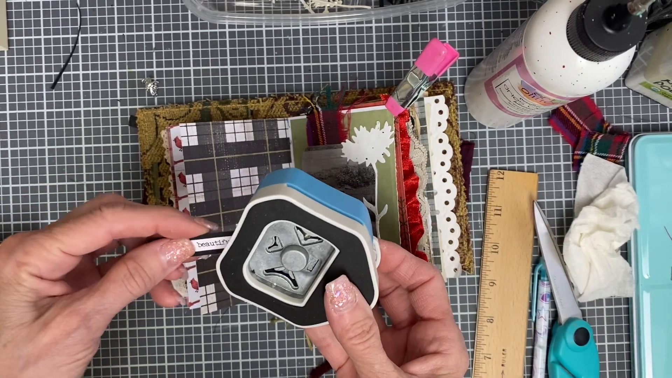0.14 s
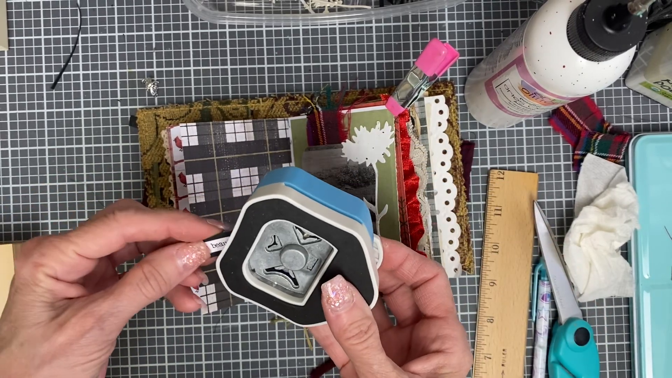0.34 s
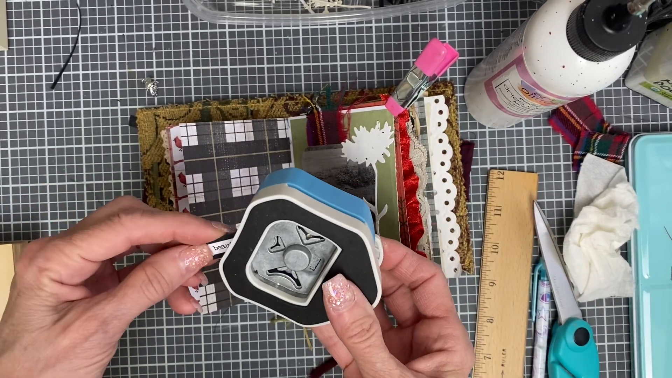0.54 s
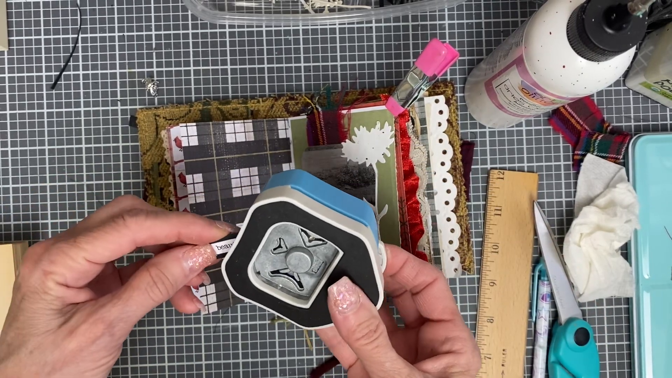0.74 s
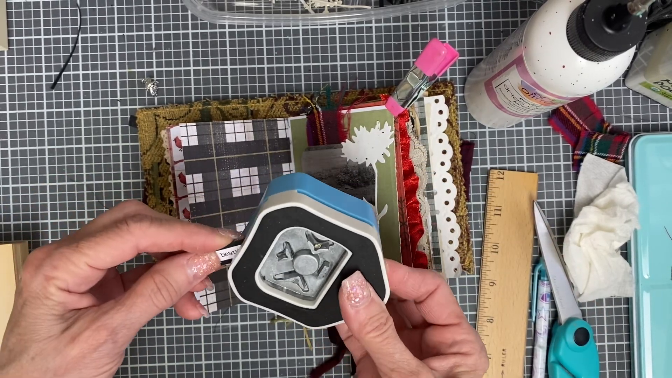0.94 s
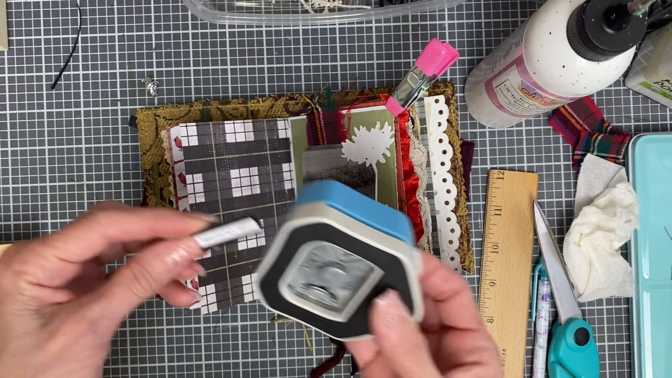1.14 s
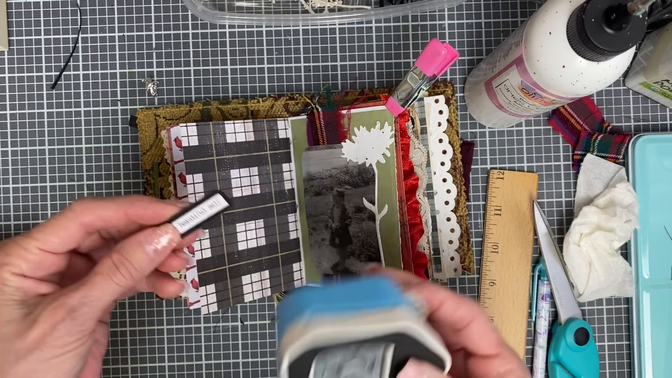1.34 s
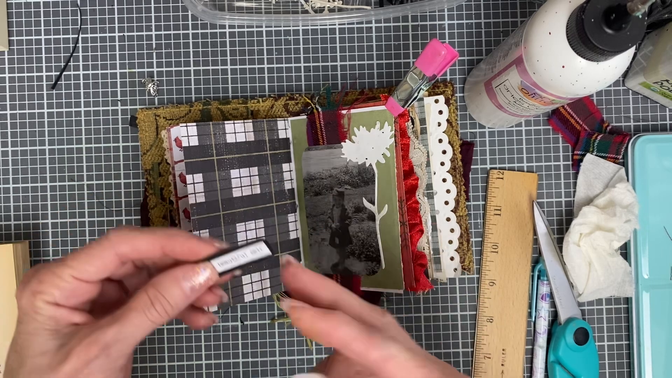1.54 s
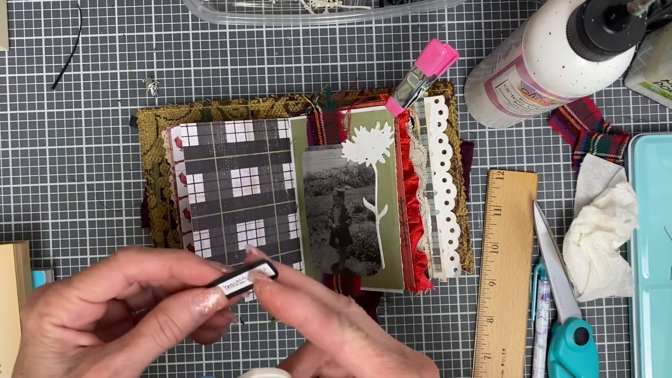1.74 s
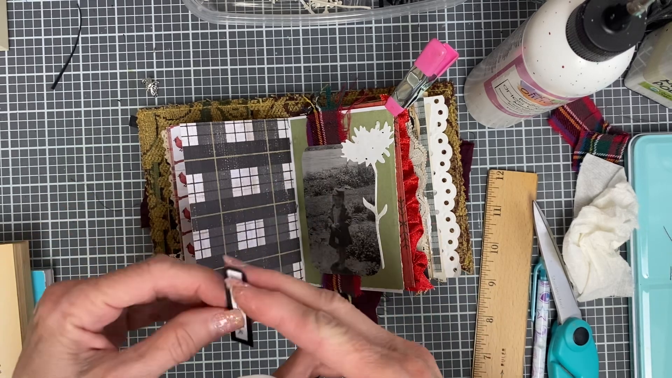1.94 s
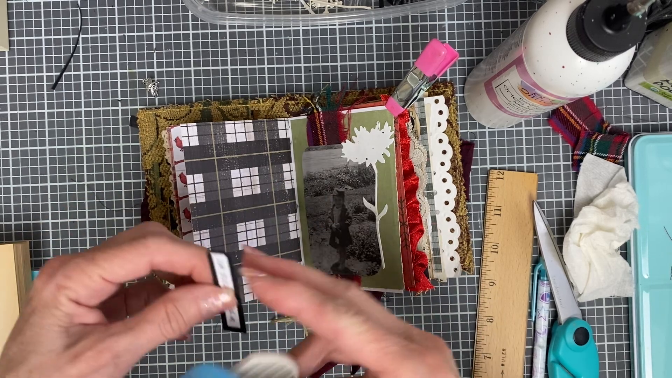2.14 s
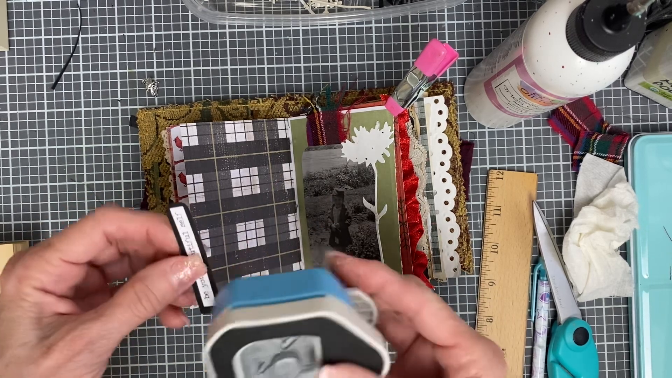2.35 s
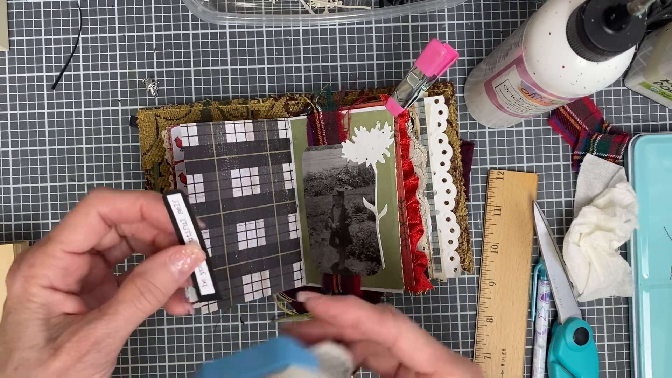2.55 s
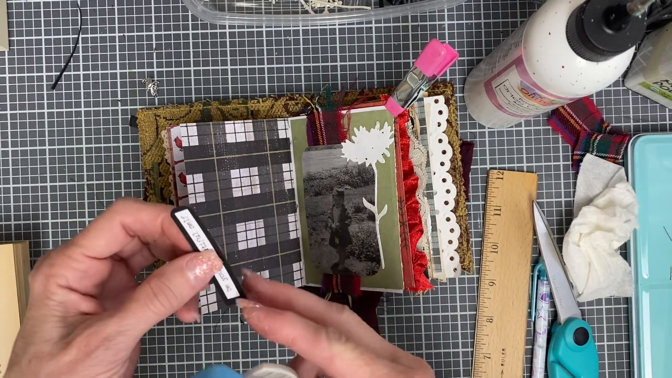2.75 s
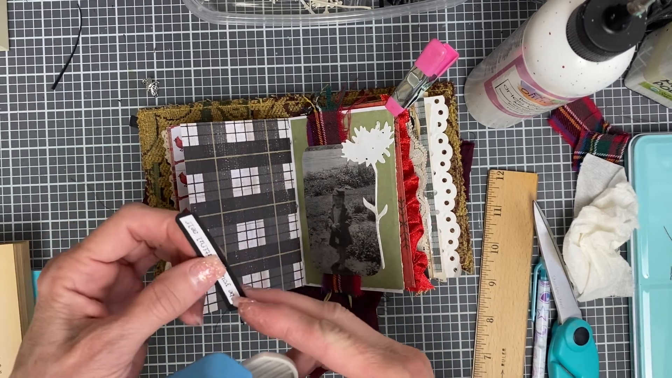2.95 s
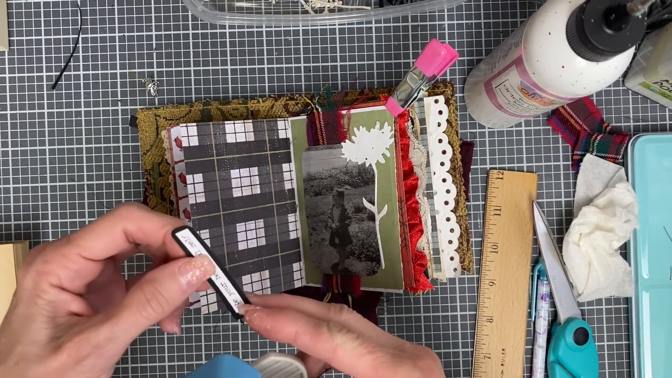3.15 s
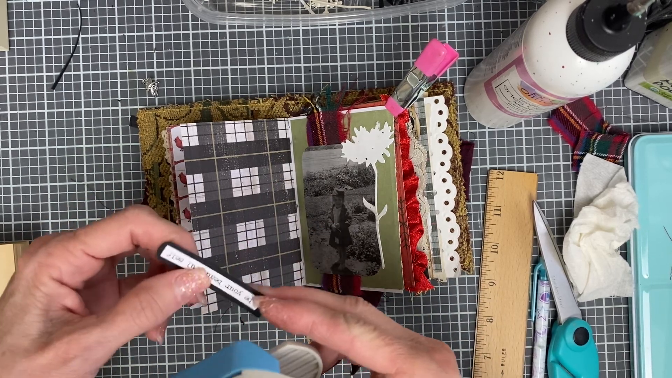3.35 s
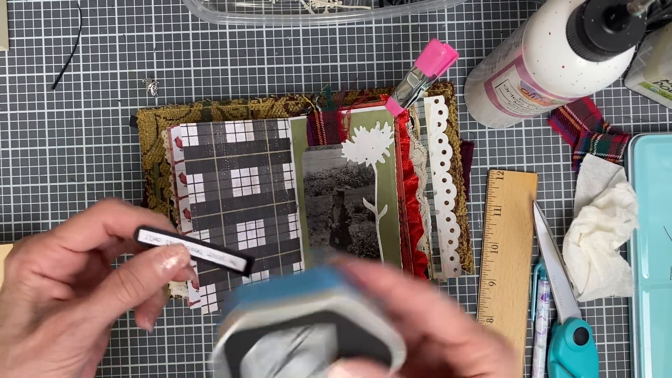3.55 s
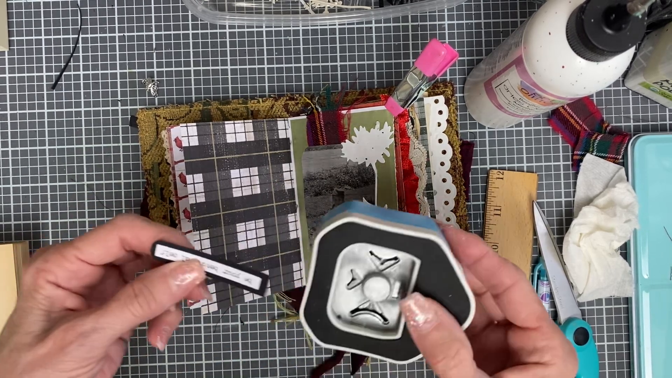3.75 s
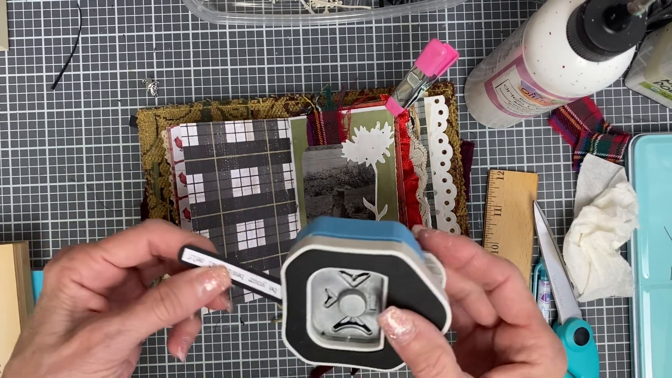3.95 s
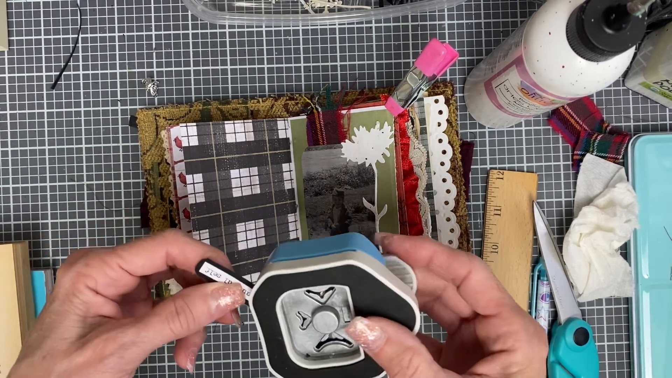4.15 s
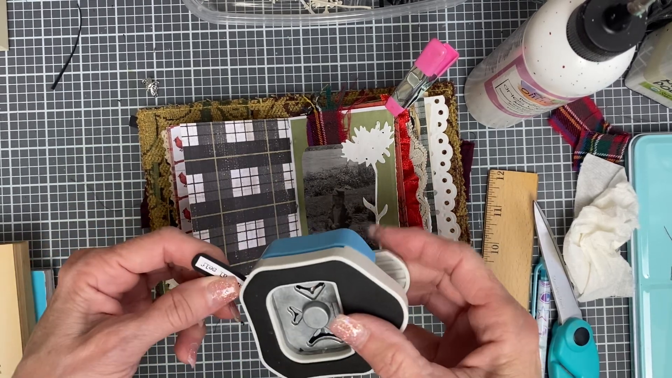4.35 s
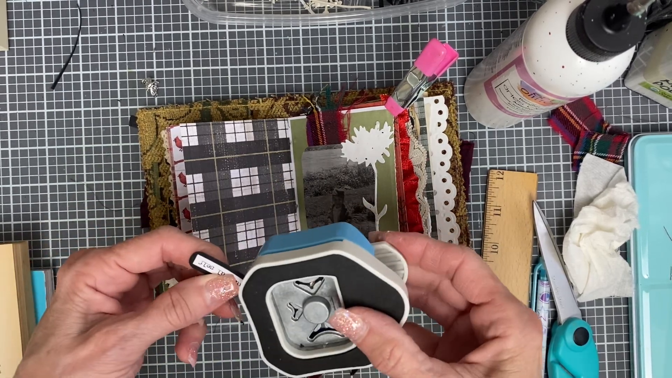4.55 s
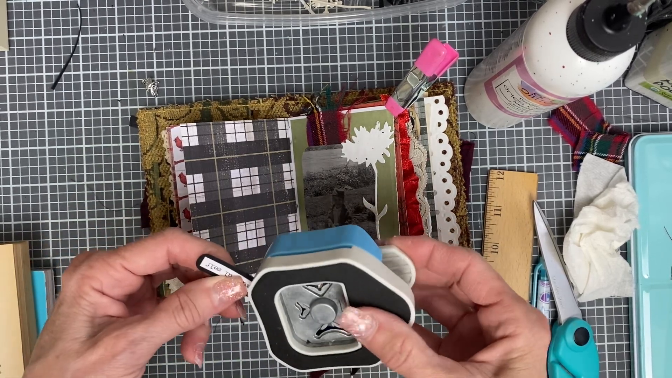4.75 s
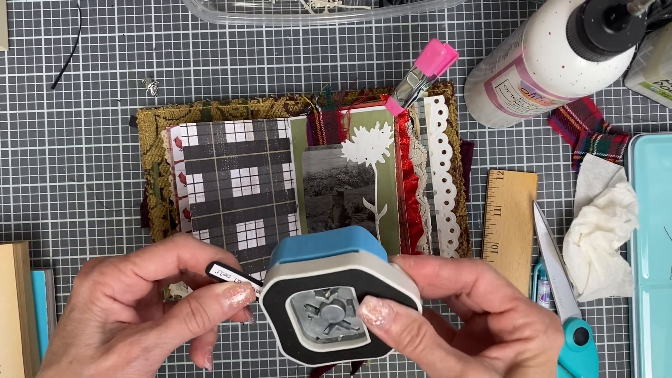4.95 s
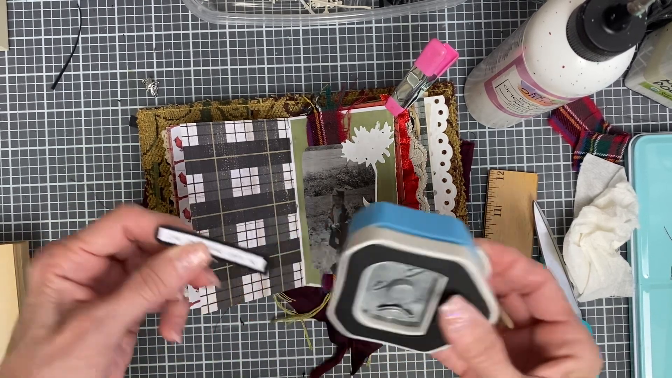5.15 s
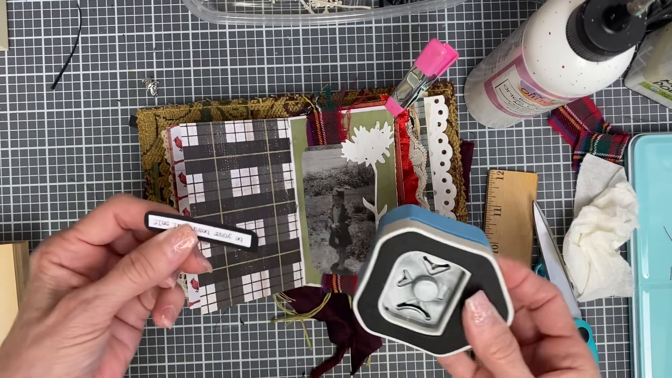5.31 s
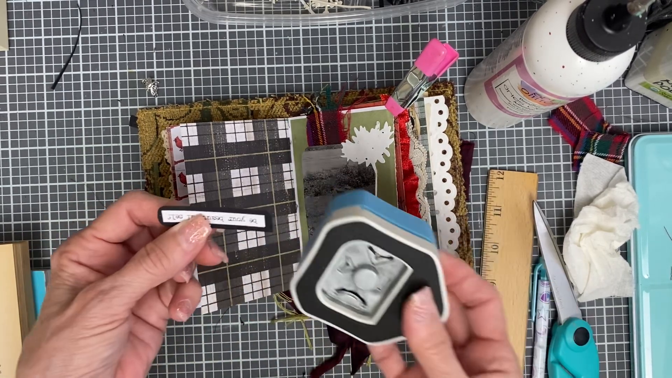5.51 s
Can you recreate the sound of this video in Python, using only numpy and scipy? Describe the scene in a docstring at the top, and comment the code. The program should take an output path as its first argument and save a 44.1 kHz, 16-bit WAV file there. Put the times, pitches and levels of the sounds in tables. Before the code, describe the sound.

Two crisp, loud clacks of a small craft punch, each followed by a lighter release click, with soft paper handling over low room rumble.

```python
"""Fingers brush a paper strip over a low rumble and mains hum; then a plastic corner punch bites it twice.
All is close under a camera in a quiet room. The lever creaks shut, the die snaps through, the spring lets go.
Contacts and lever drags are rough forces ringing casing, die and cutting edge; squeaks and spring are dying sines.
Rubs and flicks of the strip, turned by the fingers between bites, are coloured noise grains.
Sparse echoes give the room; shaped noise and wavering sines give the background noise and hum."""
import sys
import numpy as np
from scipy import signal
from scipy.fft import rfft, irfft
from scipy.io import wavfile

SR = 44100
rng = np.random.default_rng(int(sys.argv[2]) if len(sys.argv) > 2 else 0)


def inscribe(sig):
    """Save sig as 16-bit PCM at rate SR to the path in sys.argv[1].

    A 1-D sig is mono; a 2-D sig holds one channel per row.
    Samples are clipped to [-1, 1] before scaling.
    """
    pcm = np.round(np.clip(np.atleast_2d(sig).T, -1, 1) * 32767)
    wavfile.write(sys.argv[1], SR, pcm.astype(np.int16))


N = 250488  # samples

# Contacts in the punch, from lever ticks to the die breaking through and hitting its stop; shares are
# relative to the blow: [t/s, blow level/dB, thud share level/dB, case share level/dB, edge share level/dB,
# favoured case mode f/Hz, scrape peak t/ms]
PUNCH_CONTACTS = [(0.2703, -42, -21, 1.5, -8, 1300, 1.37), (0.7366, -56.5, -38.5, 14.5, -10, 1940, 1.35),
                  (0.7485, -70, -26, 16.5, -3, 1870, 0.8), (0.7921, -68.5, -9.5, 13, -5, 2820, 2.6),
                  (.8217, -47, -37.5, 0, -6.5, 2570, 1.5), (.826, -41.5, -30.5, 3, -12, 2508, 1.5),
                  (0.8407, -70.5, -10.5, 19, 4, 1760, 0.66), (0.8778, -42.5, -15, 3.5, 0.5, 1930, 7.6),
                  (.899, -33, -4.5, 4.5, -1.5, 1760, 1.6), (0.9517, -16, -15.5, 0, -6, 2100, 0.4),
                  (.9538, -11, -16.5, -3.5, 6, 1270, .5), (.9563, -10.5, -13, 2, -8, 1734, 0.55),
                  (.9612, -27.5, -16.5, 1.5, -3.5, 1690, 1.5), (1.0789, -47, -32.5, 10.5, -0.5, 1650, 0.97),
                  (1.0838, -44.5, -30.5, -0.5, -9, 1640, 1.06), (1.101, -46, -29, 1, -17, 2830, 0.96),
                  (1.1062, -40.5, -36, 1, -4.5, 1570, 1.5), (1.1116, -30, -40, 0.5, -12.5, 2780, .9),
                  (1.1442, -57.5, -13, 4.5, -9, 1776, 1.5), (1.191, -58, -27, 8.5, -21.5, 1753, 1.05),
                  (1.2701, -52.5, -33, -8.5, 7, 2160, 0.94), (1.3869, -77, -7, 12, 10, 1683, 1.2),
                  (1.4122, -77, -6, 14.5, -2, 1760, 1.3), (2.506, -79, -3, 9, 14, 1678, 1.3),
                  (2.858, -65.5, -20, 4.5, 0.5, 2170, 1.03), (4.123, -62, -21, 2, -12, 1780, 1.3),
                  (4.6493, -75, -9.5, 8.5, 0.5, 2010, 1.56), (4.7565, -63, -26, 6, -10, 1800, .6),
                  (4.7678, -53, -22, 9.5, -1.5, 1680, 1.55), (4.791, -53, -15.5, 3.5, -6, 1630, 1),
                  (4.806, -45, -17.5, 2, -6, 1750, 1.5), (4.824, -51, -23.5, 9, -11, 1660, 0.6),
                  (4.838, -46, -10.5, 6.5, 2.5, 1640, 1.16), (4.8591, -32.5, -10, 7.5, -1.5, 2080, 1.6),
                  (4.8634, -29.5, -6.5, 8, -5, 1600, 0.72), (4.8665, -18, -9.5, 5, -3, 1550, .65),
                  (4.8694, -14.5, -14, -6.5, 7.5, 1300, .4), (4.8722, -12, -16.5, -2, -2.5, 1295, 0.53),
                  (4.8806, -33, -22.5, -3, -3, 1520, 1.5), (4.9684, -57, -25, 2, 5, 1700, 1.8),
                  (4.9779, -57, -25, 3, -2, 1690, 1.2), (5.0484, -41, -36, 6, -5.5, 2130, 1.35),
                  (5.0574, -50.5, -28, 13.5, -1, 1774, 1.43), (5.0848, -49.5, -33, 9, -14.5, 1767, 1.3),
                  (5.2715, -62, -25.5, 3.5, 4, 1062, 1.12), (5.4044, -51, -24, 0, 3, 2000, 1.32)]
# The lever drags in its guide, down and up; the row at .946 s is only a short swell of rough noise into the
# bite: [full force t/s, 20 dB rise t/ms, hold t/ms, 20 dB fall t/ms, force level/dB, edge share level/dB]
DRAG_STROKES = [(.738, 19, 30, 60, -67.5, -17.5), (.832, 3, 2, 110, -62, -17.5),
                (.908, 5.2, 1.6, 12, -48, -17), (.946, 12, 4.9, 2.7, -39, -30),
                (1.1, 110, 1.73, 10, -54, -13.5), (1.113, 11, 1.65, 12, -35, -7.5),
                (1.13, 2.9, 2.05, 47, -58, -33.5), (1.16, 10.7, 25.7, 90, -71, -16),
                (4.76, 15, 85, 5, -65, -12), (4.859, 15, 0.95, 2, -40, -14),
                (5.042, 55, 1.84, 5.1, -53.5, -9), (5.056, 13.8, 1.9, 21, -44, 0),
                (5.096, 8.7, 1.7, 63, -67, -32), (5.41, 3, 5, 50, -66.5, -18)]
# Ringing modes of the plastic casing: [f/Hz, width f/Hz, relative level/dB]
CASE_MODES = [(1016, 300, -9.5), (1282, 290, -3), (1570, 210, 0), (1730, 160, 1.5), (2130, 150, -4),
              (2473, 260, -0.5), (3080, 250, -5)]
# Ringing modes of the die: [f/Hz, width f/Hz, relative level/dB]
DIE_MODES = [(3200, 450, -8), (3920, 400, 0), (4500, 550, -2), (5200, 550, -2), (5900, 700, -4)]
# Ringing modes of the cutting edge: [f/Hz, width f/Hz, relative level/dB]
EDGE_MODES = [(7050, 600, 0.5), (7700, 520, 1), (8052, 260, -0.5), (10570, 840, 2), (11350, 1000, 3),
              (13295, 290, -3.5), (14510, 1300, -2), (16120, 2000, 0)]
# Low modes of hand and casing: [f/Hz, width f/Hz, relative level/dB]
THUD_MODES = [(210, 240, -1), (430, 130, -3), (645, 120, -1), (800, 250, -14)]
# Thin tones after the bites: the casing squeaks near 1750 Hz, the spring rings at the others:
# [t/s, f/Hz, level/dB, decay t60 t/s, rise t/s]
THIN_TONES = [ (.957, 894, -66, .5, .005), (1.068, 1760, -46, .08, .012), (1.172, 1750, -58, .08, .01),
              (4.873, 894, -61, .5, .005), (4.873, 2700, -62, .35, .005), (5.09, 2010, -72, .4, .005)]
# Fingers slide over paper and plastic: [full pressure t/s, 20 dB rise t/ms, hold t/ms, 20 dB fall t/ms,
# pressure level/dB, hollow share level/dB, edge share level/dB]
FINGER_RUBS = [(.05, 32, 41, 24, -71.5, -4.5, -2.5), (.172, 18, 6, 20, -75, -2, -4),
               (.2, 6, 69, 14, -76.5, -10, -0.5), (.28, 5, 14, 68, -74, -6, -36),
               (1.418, 16, 2, 10, -77, 10.5, 2), (1.456, 41, 8.4, 88, -89, 8, 6),
               (1.626, 16.5, 2, 77, -75, -24, 2), (1.74, 110, 1.95, 58, -92, 0, 11),
               (1.87, 4.4, 19, 25, -76, -6.5, 9), (1.912, 2.9, 67, 57, -79, -19, 10),
               (1.988, 37, 38, 20, -66.5, -27, 5), (2.134, 33, 1.92, 34.7, -85.5, -23.5, 8.5),
               (2.29, 3.25, 1.86, 26.7, -81, -8, 7), (2.34, 20, 1.85, 43, -82, -19.5, 8.5),
               (2.59, 31, 18.5, 18, -90, -15, 7.5), (2.96, 16.3, 31, 13, -85.5, -5, 0),
               (3.05, 22, 19, 20, -85, -19, 0), (3.23, 10.4, 5, 20, -84.5, -20, -8),
               (3.42, 48, 37, 14, -82.5, -24, 2), (3.51, 20, 19, 29, -87.5, -8, 0),
               (3.94, 3, 1.67, 49, -80, -18, 2.5), (4.075, 36, 26.2, 20, -65.5, -10, -5),
               (4.115, 3.8, 15, 16, -86, 4, -9), (4.226, 24, 2.1, 18.2, -82, 8, -4.5),
               (4.29, 70, 9.5, 18, -69, 2.5, -4), (5.256, 4, 20, 21, -78, 1, 7),
               (5.644, 45, 2, 89, -85, -6, 3)]
# The strip flicks free of a finger or an edge: [t/s, relative flick level/dB, hollow share level/dB,
# edge share level/dB]
STRIP_FLICKS = [(0.1994, -73.5, -9, -1), (0.313, -60, -20, 12.5), (.3567, -73, -1, 20),
                (0.5778, -65, -1, 8.5), (1.3466, -64, 1, 7), (1.6252, -64.5, -22, 2),
                (1.7437, -64, -9.5, 7.5), (1.8683, -60, -10, 5), (1.908, -61.5, -14, 6.5),
                (1.914, -58, -20.5, 17), (2.291, -68.5, -17, -2), (2.6091, -67, -15, 2),
                (2.9794, -67.5, -18, -9.5), (3.063, -69, -17, -4.5), (3.44, -67.5, -20, -1),
                (3.9421, -61.5, -15.5, -4), (4.1414, -63, -3, 0.5), (4.197, -67.5, 0.5, 3),
                (4.2092, -65, -9.5, 1.5), (4.2234, -55.5, 1, 1), (4.252, -59, -9, 8.5),
                (4.2575, -56, -17, 7), (4.3421, -54.5, 4.5, 7.5), (5.4894, -72, -10, 13.5)]
# Colour of skin friction: [f/Hz, relative density level/dB]
SKIN_COLOUR = [(1800, -23), (2300, -4.5), (2900, -5), (3400, -4), (4200, -9.5), (6000, -13), (7000, -60)]
# Colour under cupped hands: [f/Hz, relative density level/dB]
HOLLOW_COLOUR = [(800, -37), (1200, -6), (1500, 4.5), (1900, 0), (2300, -31)]
# Bright colour of the paper edge: [f/Hz, relative density level/dB]
PAPER_COLOUR = [(5000, -50.5), (6200, 4), (8000, 1.5), (11000, 1), (14000, 4), (16000, -15)]
# Decay of the room: [f/Hz, t60 t/s]
ROOM_DECAY = [(250, .1), (800, .16), (1600, .14), (4000, .15), (8000, .165), (14000, .16)]
# Colour of the background noise, with its top end cut off: [f/Hz, relative density level/dB]
BACKGROUND_COLOUR = [(18, -40.5), (30, -9), (43, 0), (64, 3), (92, -14), (123, -9.5), (181, -26.5),
                     (236, -29), (367, -39), (489, -38), (1160, -48), (1350, -49.5), (1540, -49.5),
                     (3370, -54.5), (15300, -64.5), (15900, -85)]
# Left-right likeness of the background noise: [f/Hz, likeness/1]
BACKGROUND_LIKENESS = [(60, 0.97), (130, .8), (290, .6), (640, 0.21), (1400, 0.041), (3400, 0.2),
                       (5500, 0.1), (6500, .93)]
# Slow swell of the bass: [t/s, relative level/dB]
RUMBLE_SWELL = [(0.0, -59), (0.52, -60.5), (1.939, -58), (2.259, -62), (2.82, -57), (4.26, -60.5),
                (4.54, -63.5), (4.93, -58.5), (5.17, -62), (5.68, -61)]
# Mains hum: [f/Hz, rms level/dB before it wavers]
MAINS_HUM = [(60, -65.5), (120, -76)]

PUNCH_PAN_DB = 2.5  # left minus right, casing and die
PUSH_MS = 0.14  # peak time of the short blow that the hand takes
FLICK_MS = 1.3  # time constant of the dying flick
SLOPE_DB = 20  # a stroke swells by this much in its rise time and dies by it in its fall time
RUMBLE_REFERENCE_DB, BACKGROUND_LEVEL_DB = -54.5, -57.5
PORT_LEAD_S, PORT_HZ = 10 / SR, 6100  # right side early by this, above this resonance
TOP_HZ = 16100


def contacts():
    """Each contact is a short rough scrape that rings casing, die and cutting edge by its own shares."""
    out = np.zeros((2, N))
    t = np.arange(1024) / SR
    grits = rng.standard_normal((len(PUNCH_CONTACTS), 3, 1024))
    places = rng.standard_normal((len(PUNCH_CONTACTS), len(DIE_MODES)))
    thud_body, edge_body = ringing(THUD_MODES), ringing(EDGE_MODES)
    pan = gain_of(np.array([[.5], [-.5]]) * PUNCH_PAN_DB)
    push = (t * np.exp(-1000 * t / PUSH_MS))[None]
    for row, grit, place in zip(PUNCH_CONTACTS, grits, places):
        s, blow_db, thud_db, case_db, edge_db, favoured_hz, scrape_ms = row
        u = t / (max(scrape_ms, .1) / 1000)
        # each side faces another part of the casing
        force = (grit[0] + .45 * grit[1:]) * u * np.exp(-u)
        shared_force = force[[0, 0]]
        # the place of contact favours some modes: case modes lose 14 dB per octave from the favoured one
        case_body = ringing([(f, w, d - 14.0 * abs(np.log2(f / favoured_hz))) for f, w, d in CASE_MODES])
        die_body = ringing([(f, w, d + 2.5 * p) for (f, w, d), p in zip(DIE_MODES, place)])
        die = struck(force, die_body, blow_db)
        thud = struck(push, thud_body, blow_db + thud_db)
        case = struck(force, case_body, blow_db + case_db)
        edge = struck(shared_force, edge_body, blow_db + edge_db)
        # the scrape starts slightly ahead of its listed time
        add(out, s - .0006, pan * (die + case) + thud + edge)
    return out


def struck(force, body, peak_db):
    """A force rings a body; the louder side peaks at the given level."""
    ring = signal.fftconvolve(force, body[None], axes=1)
    return gain_of(peak_db) * ring / abs(ring).max()


def thin_tones():
    """Casing squeaks near 1750 Hz and spring rings at the other pitches, all dying sines."""
    out = np.zeros(N)
    t = np.arange(SR // 2) / SR
    for s, hz, db, t60, rise in THIN_TONES:
        envelope = gain_of(db - 60 * t / t60) * np.minimum(t / rise, 1)
        add(out, s, envelope * np.sin(2 * np.pi * hz * t))
    return out


def drags():
    """Uneven slips, as of the lever in its guide, ring the same casing, die and cutting edge."""
    force_gain, edge_gain = strokes(DRAG_STROKES)
    bursts_db = 5.7 * np.minimum(rng.exponential(1, N), 5)
    slips = rng.standard_normal(N) * gain_of(bursts_db + 1.0 * wander(110))
    bodies = (CASE_MODES, DIE_MODES, EDGE_MODES)
    case, die, edge = (evened(signal.oaconvolve(slips, ringing(m))[:N]) for m in bodies)
    body = gain_of(-4.5) * case + gain_of(-13.5) * die
    return force_gain * body * gain_of([[1.2], [-1.2]]) + edge_gain * edge


def rubs():
    """Dense uneven grains of skin on paper, with sudden flicks; pressure flutters."""
    flutter_db = 1.8 * wander(50) + 1.2 * wander(250)
    # rows: skin, hollow, paper edge
    drive = strokes(FINGER_RUBS) * gain_of(flutter_db + np.array([[0], [0], [2.0]]))
    t = np.arange(1024) / SR
    for s, db, hollow_db, edge_db in STRIP_FLICKS:
        shares = gain_of(db - 5.5 + np.array([[0], [hollow_db], [edge_db]]))
        add(drive, s, shares * np.exp(-1000 * t / FLICK_MS))
    bursts_db = 1.1 * np.minimum(rng.exponential(1, N), 5)
    grain = evened(rng.standard_normal((3, N)) * gain_of(bursts_db))
    wide = 0.72 * grain[0] + 0.56 * grain[1:]  # shared grain plus one of each side's own
    skin = coloured(drive[0] * wide, SKIN_COLOUR) + coloured(drive[1] * wide, HOLLOW_COLOUR)
    return skin * gain_of([[1.5], [-1.5]]) + coloured(drive[2] * grain[0], PAPER_COLOUR)


def room(x):
    """Sparse taps of random sign: quick returns from the table top, then the weaker, slower room."""
    taps = np.zeros((2, SR // 2))
    at = np.arange(60, SR // 2 - 10, 10)
    at = at + rng.integers(0, 10, (2, len(at)))
    np.put_along_axis(taps, at, rng.choice([-1., 1.], at.shape), 1)
    hz, t, z = signal.stft(taps, SR, nperseg=128)
    z[1, hz > PORT_HZ] = z[0, hz > PORT_HZ]  # one port hears the treble for both sides
    table_top = gain_of(-60 * t / 0.016)
    slow_room = gain_of(-7.0 - 60 * t / read(ROOM_DECAY, hz)[:, None])
    tail = signal.istft(z * (table_top + slow_room), SR, nperseg=128)[1]
    tail = tail / np.linalg.norm(tail[0])
    return signal.fftconvolve(x.mean(0)[None], tail, axes=1)[:, :N]


def room_tone():
    """Smooth hiss from random spectra; the bass swells slowly and carries a wavering hum."""
    frames, hz = N // 1024 + 5, np.fft.rfftfreq(4096, 1 / SR)
    a, b, c, d = rng.standard_normal((frames, 2049, 4)).T
    same = np.clip(read(BACKGROUND_LIKENESS, hz), -1, 1)[:, None]
    left = a + 1j * b
    right = same * left + np.sqrt(1 - same ** 2) * (c + 1j * d)
    s, db = np.transpose(RUMBLE_SWELL)
    swell_db = np.interp(np.arange(frames) * 1024 / SR, s, db) - RUMBLE_REFERENCE_DB
    bass_swell_db = swell_db / (1 + (hz[:, None] / 250) ** 2)  # the swell fades out above 250 Hz
    z = np.array([left, right]) * gain_of(read(BACKGROUND_COLOUR, hz)[:, None] + bass_swell_db)
    noise = signal.istft(z, nperseg=4096, noverlap=3072)[1][:, :N]
    t = np.arange(N) / SR
    hum = np.zeros(N)
    for f, db in MAINS_HUM:
        level = np.sqrt(2) * gain_of(db + 2.5 * wander(1.5))
        hum += level * np.sin(2 * np.pi * (f * t + .07 * wander(1.4)))
    return gain_of(BACKGROUND_LEVEL_DB) * evened(noise) + hum


def strokes(rows):
    """Each stroke swells, holds and dies; gives its gain, then the gain of each share of it."""
    t = np.arange(-SR // 2, SR // 2) / SR * 1000  # ms from full force
    pad = np.zeros((len(rows[0]) - 4, N + SR // 2))  # half a second of lead-in
    for s, rise, hold, fall, db, *shares_db in rows:
        drop = np.maximum(-t / max(rise, 1), 0) + np.maximum((t - hold) / max(fall, 1), 0)
        add(pad, s, gain_of(db - SLOPE_DB * drop + np.array([0, *shares_db])[:, None]))
    return pad[:, SR // 2:]


def ringing(modes, size=2048):
    """Impulse response of decaying modes, neighbours in opposite sign."""
    t = np.arange(size) / SR
    out = np.zeros(size)
    for k, (f, width, db) in enumerate(modes):
        out += (-1) ** k * gain_of(db) * np.exp(-np.pi * width * t) * np.sin(2 * np.pi * f * t)
    return out


def coloured(x, spectrum):
    """Gives x a spectrum that leaves the power of white noise as it is."""
    gain = evened(gain_of(read(spectrum, np.fft.rfftfreq(N, 1 / SR))))
    return irfft(rfft(x) * gain, N)


def wander(hz):
    """Slow chance below hz, rms 1."""
    return evened(signal.resample(rng.standard_normal(int(2 * hz * N / SR) + 2), N))


def gain_of(db):
    """Level in dB to amplitude."""
    return 10 ** (np.asarray(db) / 20)


def evened(x):
    """Scales to rms 1."""
    return x / np.sqrt(np.mean(x ** 2) + 1e-20)


def read(points, hz):
    """Reads a curve at hz, straight between its points on a log frequency axis."""
    f, value = np.transpose(points)
    return np.interp(np.log(hz + 1), np.log(f + 1), value)


def add(mix, s, sound):
    """Lays a sound into the mix at s seconds, cut at the end."""
    part = mix[..., round(s * SR):][..., :sound.shape[-1]]
    part += sound[..., :part.shape[-1]]


def scene():
    """Punch, thin tones, fingers and drags close by, their room echo, and the room tone."""
    near = contacts() + thin_tones() + rubs() + drags()
    return near + gain_of(-7.5) * room(near) + room_tone()


def record(dry):
    """Above the port resonance the right side is inverted and early; then the bass cut and the band limit."""
    hz = np.fft.rfftfreq(N, 1 / SR)
    inverted_early = 2 * np.pi * hz * PORT_LEAD_S - 3 * np.pi
    slight_lag = -.55 * np.minimum(hz / 2000, 1)
    turn = np.where(hz > PORT_HZ, inverted_early, slight_lag)  # phase of the right side, radians
    bass_cut = 1 / (1 + (33 / (hz + 1)) ** 8)
    pair = irfft(rfft(dry) * bass_cut * np.exp(1j * np.array([0 * turn, turn])), N)
    band_limit = signal.firwin(301, TOP_HZ, window=("kaiser", 9), fs=SR)
    return signal.oaconvolve(pair, band_limit[None], "same")


dry = scene()
out = record(dry)
inscribe(out)
```